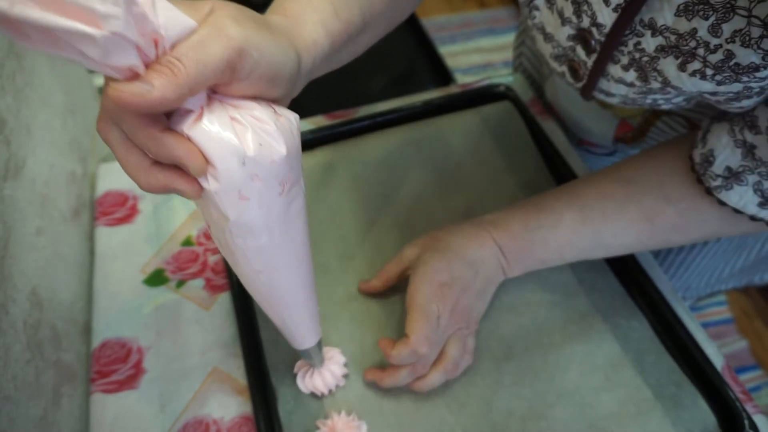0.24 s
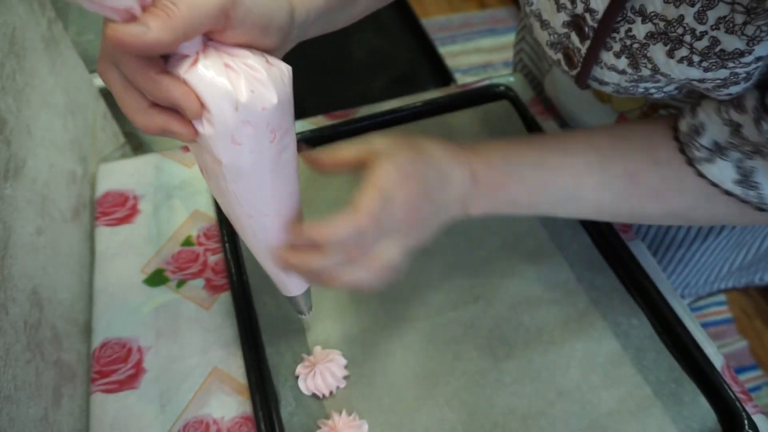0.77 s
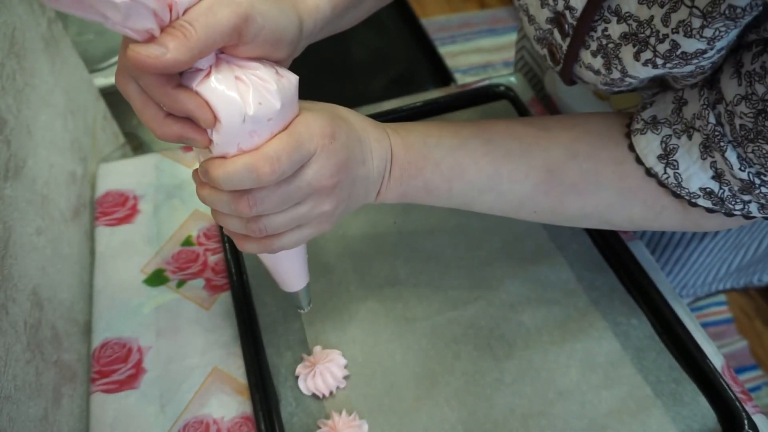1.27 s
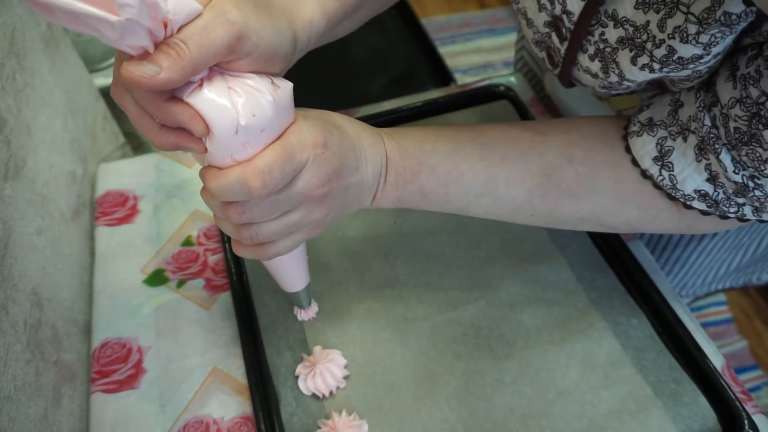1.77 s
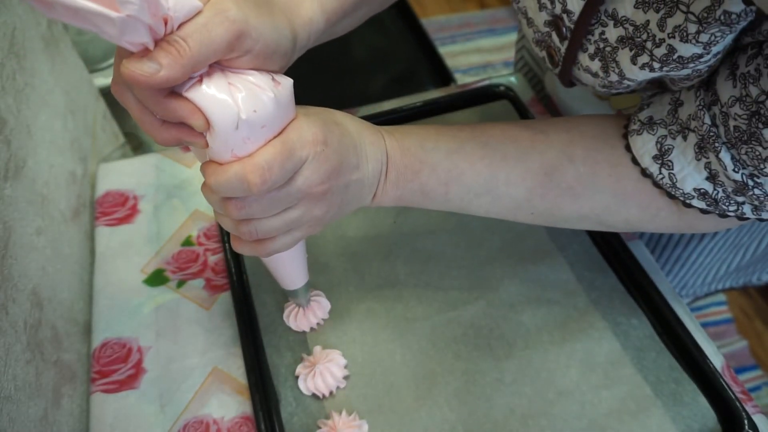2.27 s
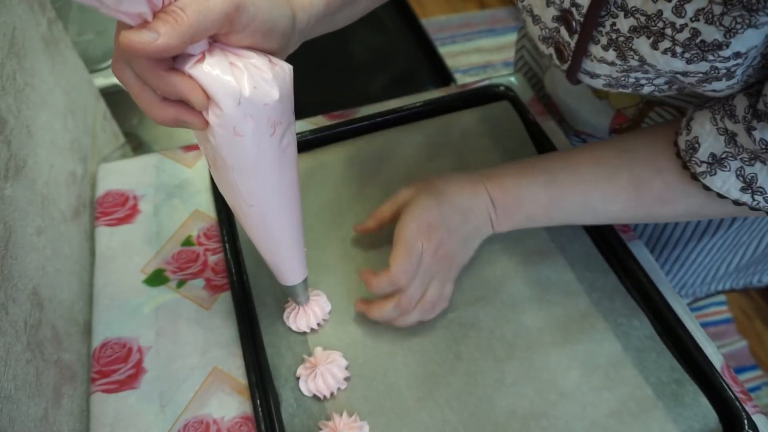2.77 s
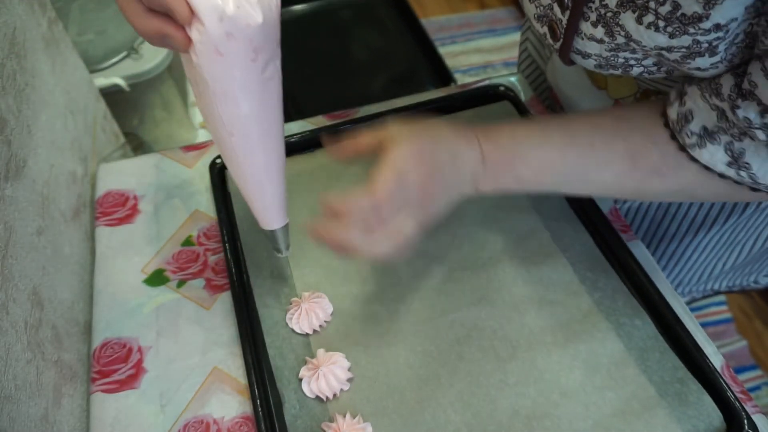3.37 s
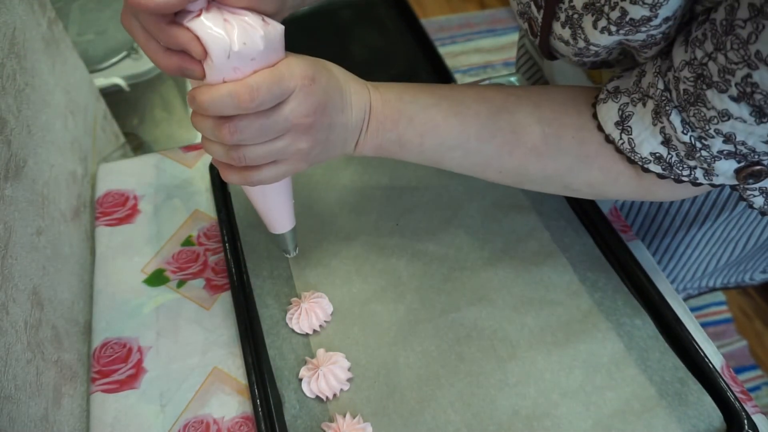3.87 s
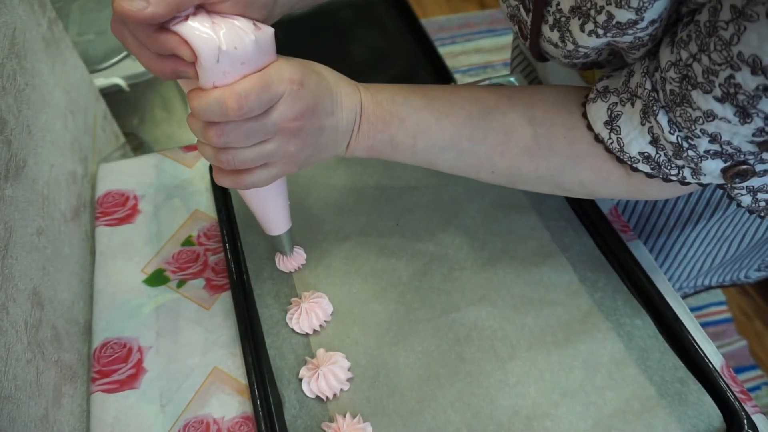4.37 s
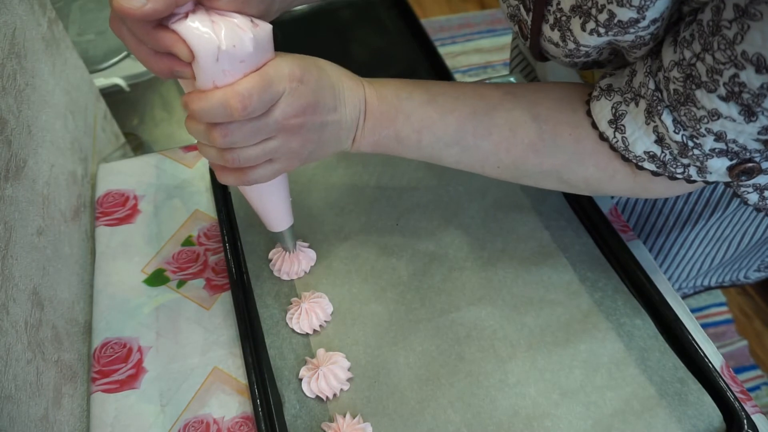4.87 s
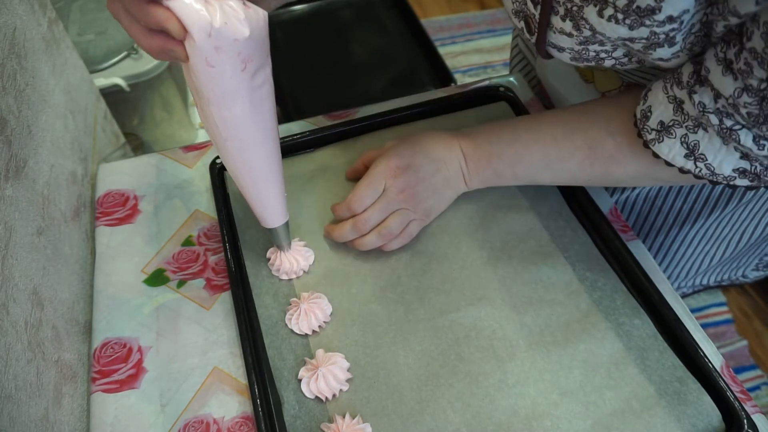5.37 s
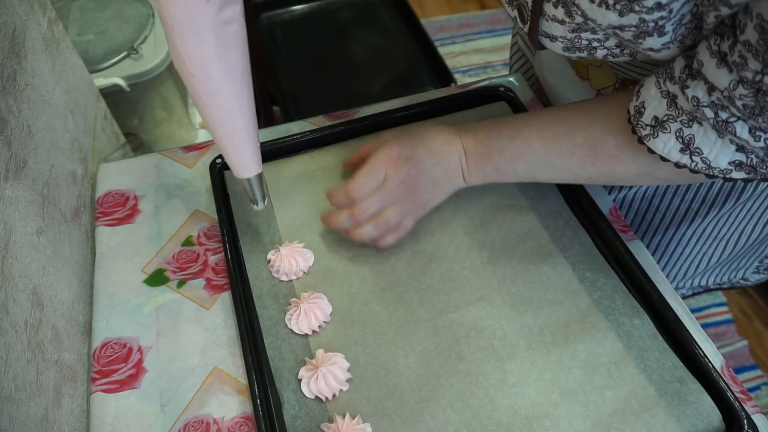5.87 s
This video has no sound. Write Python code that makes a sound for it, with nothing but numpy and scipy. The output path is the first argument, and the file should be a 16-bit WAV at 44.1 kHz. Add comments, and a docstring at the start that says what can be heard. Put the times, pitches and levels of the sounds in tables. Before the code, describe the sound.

Close stereo pickup in a small kitchen. Stiff parchment crackles loudly under a hand at the start, then quiets to faint plastic pops from a squeezed piping bag. A second dense flurry with a hollow slap comes just before three seconds, then more soft pops, and the sharpest snap just after five seconds, followed by scattered crinkles. Skin slides softly; steady low murmur behind.

```python
"""Baking parchment crinkles in loud flurries as a hand presses it down on a tray and meringue is piped. Bursts
of noise, coloured at the pitch of the folds, make the presses, snapping creases and slaps. The plastic piping
bag gives dull pops from short, damped rings, and a sleeve brushing past as the arm moves adds a soft hiss. Low
rumbles make the bumps of the tray and the thuds of the filling; a small kitchen adds a short echo tail, and
steady noise murmurs behind."""
import sys
import numpy as np
from scipy import signal
from scipy.fft import rfft, irfft
from scipy.io import wavfile
from scipy.ndimage import uniform_filter1d

SR = 44100
rng = np.random.default_rng(int(sys.argv[2]) if len(sys.argv) > 2 else 0)


def generate_wav(signal):
    """Clip the signal to [-1, 1] and save it as 16-bit WAV at the path in sys.argv[1]."""
    frames = np.transpose(np.atleast_2d(signal))
    scaled = np.clip(frames, -1, 1) * 32767
    pcm = np.round(scaled).astype(np.int16)
    wavfile.write(sys.argv[1], SR, pcm)


N = 270377  # length in samples

# Event levels below are starting levels: each sound's function adds its own trim in dB.
# How the background swells as the arms move: (time [s], level change [dB])
ARM_STIR = [(0, -1.5), (1.1, 0), (1.4, -3.5), (2.2, -2), (2.8, -1.5), (3.8, -0.5), (4.7, -1), (6.13, 0.5)]
# Tone of the background: (frequency [Hz], relative level [dB per Hz])
MURMUR_SPECTRUM = [(25, -16), (60, -14), (100, -8.5), (150, -3), (250, -5), (450, -6.5), (680, -12),
                   (1000, -9), (1260, -7.5), (1500, -18.5), (2500, -14), (4000, -20), (8000, -23),
                   (16000, -23.5)]
# How alike left and right are in the background: (frequency [Hz], likeness [0 to 1])
SIDE_LIKENESS = [(40, 0.59), (130, 0.9), (300, 0.38), (1000, 0.15), (3000, 0.077), (12000, 0.08)]
# Strokes of a sleeve as the arm moves between tray and bag: # (time of fastest movement [s], hiss level [dB],
# sheen level [dB], swell time [s], fade time [s])
HAND_STROKES = [(0.05, -55.5, -80, .2, 0.63), (0.89, -53, -59.5, 0.2, 0.28),
                (2.439, -58.5, -62, 0.13, 0.41), (3.2, -65, -69, 0.28, 0.43),
                (3.55, -59.5, -59.5, 0.21, .22), (4.12, -66, -76, 0.04, 0.56), (4.9, -57.5, -59, .09, 0.3),
                (5.3, -52.5, -66, .2, 0.86), (6.0, -62.5, -69, 0.065, 0.35)]
# Tone of the sliding hiss: (frequency [Hz], relative level [dB per Hz])
HISS_SPECTRUM = [(200, -20), (900, -3.5), (1400, -3), (2500, 0), (4000, -4), (6000, -11), (9000, -22.5),
                 (16000, -24)]
# Tone of the airy sheen above it: (frequency [Hz], relative level [dB per Hz])
SHEEN_SPECTRUM = [(3000, -27), (6000, -11), (10000, 1), (13000, 3), (16000, -6)]
# Presses of the hand that flex parchment (loud) or bag (soft):
# (start [s], end [s], body level [dB], crackle level [dB], fold pitch [Hz])
PRESSES = [(0.039, 0.057, -39.5, -48.5, 3100), (0.07, 0.299, -47.5, -56, 3030),
           (0.074, 0.119, -38, -44, 3230), (0.32, 0.354, -40, -45, 3120), (0.589, 0.642, -50, -57, 2730),
           (0.668, 0.739, -58.5, -72, 2900), (1.099, 1.131, -50.5, -66, 3026),
           (2.448, 2.617, -57, -63, 2640), (2.762, 2.853, -42, -48.5, 2770),
           (2.816, 2.836, -35.5, -43, 2640), (2.914, 2.984, -36, -45, 2770), (3.002, 3.06, -35, -43, 2820),
           (3.07, 3.118, -51.5, -59, 3170), (3.226, 3.265, -43.5, -50, 2920), (3.46, 3.64, -66, -76, 2700),
           (4.096, 4.115, -61, -70, 2300), (4.878, 4.934, -52.5, -61, 2304), (5.166, 5.24, -54, -59, 2470),
           (5.213, 5.224, -41.5, -58, 2373), (5.28, 5.51, -50.5, -64, 3170),
           (5.253, 5.28, -29, -35.5, 3020), (5.531, 5.582, -43.5, -51.5, 2893),
           (5.802, 5.857, -40, -44.5, 2956)]
# Tone of a sheet's folds: (frequency [Hz], relative level [dB per Hz])
BODY_SPECTRUM = [(60, -33), (200, -18.5), (450, -11), (720, -11.5), (1000, -8), (1650, -4), (2100, -1),
                 (2600, -1), (3050, -0.5), (4200, 0.5), (5100, -5), (7000, -33.5)]
# Tone of a sheet's small facets: (frequency [Hz], relative level [dB per Hz])
CRACKLE_SPECTRUM = [(1500, -16.5), (3500, -9.5), (5200, 2.5), (7500, -1), (10000, 0), (13000, 1.5),
                    (16000, -10)]
# Big creases snapping over: (time [s], body level [dB], crackle level [dB], fold pitch [Hz])
BIG_CREASES = [(0.0779, -24, -34.5, 3630), (0.1496, -44, -44.5, 2950), (0.245, -42, -42, 3400),
               (0.1695, -32.5, -45, 3250), (0.1856, -33, -43, 3070), (0.2015, -32, -55, 3320),
               (0.222, -28.5, -37.5, 3070), (0.266, -38.5, -36, 3450), (0.3374, -37, -45, 2670),
               (0.4162, -54, -56.5, 3450), (0.6228, -43.5, -47, 2750), (0.6064, -42, -50, 2440),
               (0.681, -49, -51.5, 3160), (2.4547, -56, -42, 2150), (2.4705, -42.5, -57, 2230),
               (2.573, -42.5, -60, 2260), (2.614, -42.5, -52, 2760), (2.7656, -31.5, -38.5, 2870),
               (2.7798, -41, -45, 3050), (2.936, -31, -43, 3050), (3.0354, -37, -45, 3050),
               (2.825, -24.5, -38, 2780), (2.876, -28, -33.5, 2950), (3.0121, -32.5, -51, 2780),
               (3.0441, -42, -35, 2800), (3.111, -47, -47, 3120), (3.2394, -36, -33, 2620),
               (3.2934, -46, -56, 2230), (3.3155, -47.5, -58, 3080), (3.4301, -45.5, -48, 3730),
               (4.1356, -51, -53, 3220), (4.2804, -50, -58.5, 2400), (4.6923, -59, -57, 2500),
               (5.1141, -52.5, -54, 2870), (5.5398, -36.5, -50, 2900), (4.9062, -48, -47.5, 2470),
               (4.9604, -38.5, -58, 2670), (5.0774, -63, -53, 2250), (5.2638, -21.5, -26.5, 3170),
               (5.2853, -35, -37, 2500), (5.378, -33.5, -38.5, 3310), (5.4212, -31.5, -44, 3080),
               (5.4581, -33.5, -37.5, 3630), (5.5718, -39, -36.5, 3900), (5.6136, -43.5, -66, 2200),
               (5.794, -34, -47, 3294), (5.8486, -31.5, -40.5, 3230), (5.95, -51, -55, 2470),
               (5.9862, -43.5, -55, 2820), (6.073, -46.5, -66, 2700)]
# The hand landing on the tray: (time [s], level [dB])
TRAY_LANDINGS = [(0.077, -48), (2.78, -53), (5.262, -51.5)]
# What tray and table answer with: (pitch [Hz], level against the landing [dB], fade time [s])
TRAY_TONES = [(145, -0.5, 0.027), (44, -12.5, 0.053)]
# Lighter bumps and scuffs of hand and nozzle: (time [s], level [dB], pitch [Hz])
LIGHT_BUMPS = [(3.211, -55, 330), (3.359, -52, 167), (3.36, -59.5, 650), (5.818, -60, 190)]
# Pops of the tight bag, each with a thud of the filling; pops() shifts the pitch by pitch_ratio:
# (time [s], pop level [dB], pitch before the shift [Hz], thud level [dB])
BAG_POPS = [(1.122, -50, 2170, -47.5), (1.5188, -41, 2730, -64), (1.6694, -53, 2930, -65),
            (1.7296, -37, 2530, -47), (1.932, -54, 1520, -51), (2.454, -40, 1900, -45.5),
            (3.6504, -45.5, 2070, -68), (4.1972, -44, 2120, -41.5), (4.246, -51.5, 2270, -57),
            (4.2801, -49.5, 2350, -54), (4.3294, -53.5, 1700, -56), (4.3451, -51, 2200, -61),
            (4.3565, -53, 2120, -66), (4.3842, -56, 2230, -66), (4.919, -48, 2570, -46.5)]
# Raised parchment slapped flat on the tray: (time [s], level [dB], pitch [Hz])
PAPER_SLAPS = [(2.823, -28, 2323), (5.2495, -20.5, 2190), (5.262, -37, 2050)]
# Tone of the room's echo tail: (frequency [Hz], relative level [dB per Hz])
ROOM_SPECTRUM = [(100, -7), (1000, 8.5), (3000, -4), (6000, -0.5), (16000, -4.5)]

# Loudness follows hand speed to these powers: the sheen grows faster with speed than the hiss.
HISS_POWER, SHEEN_POWER = 0.91, 2.2
# A press takes hold, holds and lets go; then the sheet goes on settling, more quietly.
ATTACK_S, RELEASE_S = 0.004, 0.0072
SETTLE_DB, SETTLE_S = -14.5, 0.015
# Small creases flip at random in a press: rate, level against the press, scatter of level and pitch.
STRAY_PER_S, STRAY_DB, STRAY_SPREAD_DB, STRAY_SPREAD_OCTAVES = 35, 1.5, 5.5, 0.33
# Thuds of the filling share one pitch and fade; light bumps share one fade.
THUD_HZ, THUD_FADE_S, BUMP_FADE_S = 322, 0.0037, 0.025
CUTOFF_HZ = 16100


def from_db(db):
    """Turn decibels into a gain."""
    return 10 ** (np.asarray(db) / 20)


def rms_one(x):
    """Scale a sound so that its rms (average strength) is 1."""
    return x / np.sqrt(np.mean(x ** 2) + 1e-20)


def at_hz(points, size):
    """Read a table of (frequency, value) at every frequency of an FFT."""
    hz, value = np.transpose(points)
    grid_hz = np.fft.rfftfreq(size, 1 / SR)
    return np.interp(np.log(grid_hz + 1), np.log(hz), value)


def in_time(rows):
    """Turn a table of (time, level) into a gain at every sample."""
    return from_db(np.interp(np.arange(N) / SR, *np.transpose(rows)))


def colour(x, spectrum, size=2048):
    """Give both sides the tone of a spectrum without changing the power of white noise."""
    cepstrum = irfft(np.log(from_db(at_hz(spectrum, size))))
    # Keeping one half of the cepstrum makes a filter that never sounds before its input.
    response = irfft(np.exp(rfft(2 * cepstrum[:size // 2], size)))
    response /= np.linalg.norm(response)
    return signal.fftconvolve(x, response[None])[:, :x.shape[1]]


def resonate(x, hz, q):
    """Let one resonance ring, with gain 1 at its pitch; a higher q rings longer."""
    b, a = signal.iirpeak(hz, q, fs=SR)
    return signal.lfilter(b, a, x)


def add(track, s, sound):
    """Mix a stereo sound into the track at a time in seconds."""
    at = int(s * SR)
    track[:, at:at + sound.shape[1]] += sound[:, :N - at]


def radiate(force, alike):
    """Shape noise by a force; a wide source reaches the two sides only partly alike."""
    shared, *own = rng.standard_normal((3, len(force)))
    return force * (np.sqrt(alike) * shared + np.sqrt(1 - alike) * np.array(own))


def grains(size, per_s, spread_db, even_s, last_s):
    """Tiny buckles of uneven size strike at random, with even power over longer stretches."""
    strikes = rng.random(size) < per_s / SR
    sizes = strikes * from_db(spread_db * np.minimum(rng.exponential(1, size), 4))
    # Each strike leaves power that fades away over last_s.
    power = signal.lfilter([1], [1, -np.exp(-1 / (last_s * SR))], sizes ** 2 + 1e-6)
    return np.sqrt(power / uniform_filter1d(power, int(even_s * SR)))


def murmur(level_db):
    """Make steady background noise, more alike on both sides in the bass."""
    alike = at_hz(SIDE_LIKENESS, N)
    mid, side = rfft(rng.standard_normal((2, N))) * from_db(at_hz(MURMUR_SPECTRUM, N))
    side = side * np.sqrt((1 - alike) / (1 + alike))
    mid, side = irfft(mid, N), irfft(side, N)
    return from_db(level_db) * np.array([mid + side, mid - side]) / np.std(mid)


def slide(level_db, sheen_db):
    """A sleeve hisses as the arm moves, with an airy sheen when fast; each stroke speeds up, then slows to
    rest."""
    t, hiss, sheen = np.arange(N) / SR, 0, 0
    for s, stroke_hiss_db, stroke_sheen_db, swell_s, fade_s in HAND_STROKES:
        speed = np.interp(t, [s - swell_s, s, s + fade_s], [0, 1, 0])
        # Overlapping strokes add in power.
        hiss = np.hypot(hiss, from_db(stroke_hiss_db + level_db) * speed ** HISS_POWER)
        sheen = np.hypot(sheen, from_db(stroke_sheen_db + sheen_db) * speed ** SHEEN_POWER)
    grain = grains(N, per_s=3500, spread_db=2.0, even_s=0.089, last_s=0.00035)
    hiss_sound = colour(radiate(hiss * grain, alike=0.4), HISS_SPECTRUM)
    sheen_sound = colour(radiate(sheen * grain, alike=0.36), SHEEN_SPECTRUM)
    return hiss_sound + sheen_sound


def sheet(force, body_db, crackle_db, fold_hz, facet_envelope=1):
    """A moving fold sounds at its own pitch; small facets crackle far above, differently each time."""
    body = radiate(force, alike=0.77)
    body = colour(body + 1.75 * resonate(body, fold_hz, q=3.5), BODY_SPECTRUM)
    crackle = radiate(force * facet_envelope, alike=0.3)
    facet_hz = rng.uniform(6360, 9500)
    crackle = colour(crackle + 0.74 * resonate(crackle, facet_hz, q=0.82), CRACKLE_SPECTRUM)
    strength = np.sqrt(np.mean(force ** 2))
    return strength * (from_db(body_db) * rms_one(body) + from_db(crackle_db) * rms_one(crackle))


def crumples(body_db, crackle_db):
    """A swarm of buckles drives a sheet as the hand flexes it; it settles after the hand lets go."""
    out = np.zeros((2, N))
    for start, end, body, crackle, hz in PRESSES:
        t = np.arange(-0.015, end - start + 0.2, 1 / SR)  # time from the start of the press
        after = np.maximum(t - (end - start), 0)
        settling = from_db(SETTLE_DB) * np.exp(-after / SETTLE_S)
        release = np.maximum(np.exp(-after / RELEASE_S), settling)
        gate = np.exp(np.minimum(t, 0) / ATTACK_S) * release
        force = gate * grains(len(t), per_s=1300, spread_db=3.5, even_s=0.04, last_s=0.00076)
        add(out, start + t[0], sheet(force, body + body_db, crackle + crackle_db, hz))
    return out


def stray_creases():
    """Scatter small creases unevenly through every press, as rows like those of BIG_CREASES."""
    rows = []
    for start, end, body, crackle, hz in PRESSES:
        places = rng.random(32)
        scatter = rng.standard_normal((32, 3)).clip(-1.5, 1.5)
        for k, (place, (a, b, c)) in enumerate(zip(places, scatter)):
            s = start + (k + place) / STRAY_PER_S
            if s < end:
                crease_body = body + STRAY_DB + STRAY_SPREAD_DB * a
                crease_crackle = crackle + STRAY_DB + STRAY_SPREAD_DB * b
                rows.append((s, crease_body, crease_crackle, hz * 2 ** (STRAY_SPREAD_OCTAVES * c)))
    return rows


def snaps(creases, fade_s, crackle_fade_s, body_db, crackle_db):
    """A crease flips with a sharp burst that dies in milliseconds, its bright crackle soonest."""
    t, out = np.arange(700) / SR, np.zeros((2, N))
    force = rms_one((1 - np.exp(-t / 0.00016)) * np.exp(-t / fade_s))
    brief = np.exp(-t / crackle_fade_s)
    for s, body, crackle, hz in creases:
        add(out, s, sheet(force, body + body_db, crackle + crackle_db, hz, facet_envelope=brief))
    return out


def soft_contacts():
    """List landings, thuds of the filling and light bumps as (time, level, pitch, fade time)."""
    landings = [(s, db + tone_db, hz, fade_s)
                for s, db in TRAY_LANDINGS for hz, tone_db, fade_s in TRAY_TONES]
    thuds = [(s, db, THUD_HZ, THUD_FADE_S) for s, _, _, db in BAG_POPS]
    light = [(s, db, hz, BUMP_FADE_S) for s, db, hz in LIGHT_BUMPS]
    return landings + thuds + light


def bumps(q, level_db, low_ratio):
    """Soft contacts give short, broad rumbles with little sound far below their own pitch."""
    t, out = np.arange(SR // 4) / SR, np.zeros((2, N))
    for s, db, hz, fade_s in soft_contacts():
        force = (1 - np.exp(-t / 0.00078)) * np.exp(-t / fade_s)
        rumble = resonate(resonate(radiate(force, alike=1.0), hz, q), hz, q)
        low_cut = signal.butter(4, low_ratio * hz, "high", fs=SR, output="sos")
        rumble = signal.sosfilt(low_cut, rumble)
        add(out, s, from_db(db + level_db) * rms_one(rumble) * np.sqrt(np.mean(force ** 2)))
    return out


def pops(q, level_db, pitch_ratio, flutter_db, flutter_s, damping_hz):
    """One push makes the tight bag ring briefly and flutter out, because the filling damps it."""
    t, out = np.arange(1400) / SR, np.zeros((2, N))
    for s, db, hz, _ in BAG_POPS:
        flutter = radiate(from_db(flutter_db) * np.exp(-t / flutter_s), alike=0.9)
        push = signal.unit_impulse(len(t)) + flutter
        ring = resonate(resonate(push, hz * pitch_ratio, q), hz * pitch_ratio, q)
        add(out, s, from_db(db + level_db) * rms_one(ring))
    damping = signal.butter(4, damping_hz, fs=SR, output="sos")  # dulls the treble
    return signal.sosfilt(damping, out)


def slaps(q, fade_s, level_db):
    """A whole arch of paper collapses and rings briefly at one hollow pitch."""
    t, out = np.arange(SR // 12) / SR, np.zeros((2, N))
    force = np.exp(-t / fade_s)
    for s, db, hz in PAPER_SLAPS:
        ring = resonate(resonate(radiate(force, alike=1.0), hz, q), hz, q)
        add(out, s, from_db(db + level_db) * rms_one(ring) * np.sqrt(np.mean(force ** 2)))
    return out


def kitchen(x, room_db, t60):
    """Add a short room tail, different on each side, that drops 60 dB in t60 seconds."""
    t = np.arange(SR // 2) / SR
    echoes = rng.standard_normal((2, len(t))) * (t > 0.003) * from_db(-60 * t / t60)
    tail = colour(echoes, ROOM_SPECTRUM)
    tail /= np.linalg.norm(tail, axis=1, keepdims=True)
    return x + from_db(room_db) * signal.fftconvolve(x, tail, axes=1)[:, :N]


def ports(pair, turn_hz, q, pan_db):
    """The right microphone port trails the left by half a cycle at turn_hz; pan_db sets the balance."""
    left, right = pair
    right = right - 2 * resonate(right, turn_hz, q)  # shifts timing, not loudness
    return np.array([left * from_db(pan_db / 2), right * from_db(-pan_db / 2)])


def scene():
    """Put parchment, bag and hands in the kitchen, over the background."""
    background = in_time(ARM_STIR) * murmur(level_db=-60.25)
    hands = slide(level_db=1.5, sheen_db=3.0)
    presses = crumples(body_db=0.8, crackle_db=1.2)
    strays = snaps(stray_creases(), fade_s=0.0012, crackle_fade_s=0.002, body_db=-9.0, crackle_db=-3.5)
    creases = snaps(BIG_CREASES, fade_s=0.0026, crackle_fade_s=0.004, body_db=-7.0, crackle_db=-3.0)
    contacts = bumps(q=0.66, level_db=3.0, low_ratio=0.51)
    bag = pops(q=0.77, level_db=-7.5, pitch_ratio=0.96,
               flutter_db=-17.0, flutter_s=0.0024, damping_hz=5200)
    arches = slaps(q=6.4, fade_s=0.011, level_db=-2.0)
    close = hands + presses + strays + creases + contacts + bag + arches
    heard = kitchen(close, room_db=-8.0, t60=0.21)
    return ports(heard, turn_hz=5250, q=2.15, pan_db=-2.0) + background


def record(dry):
    """Cut the top steeply above CUTOFF_HZ."""
    top_cut = signal.ellip(10, 0.2, 70, CUTOFF_HZ, fs=SR, output="sos")
    return signal.sosfilt(top_cut, dry)


dry = scene()
out = record(dry)
generate_wav(out)
```